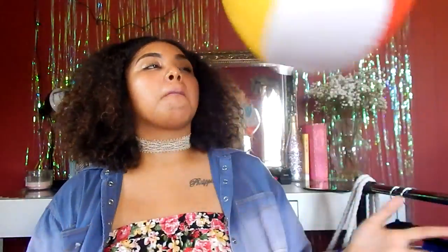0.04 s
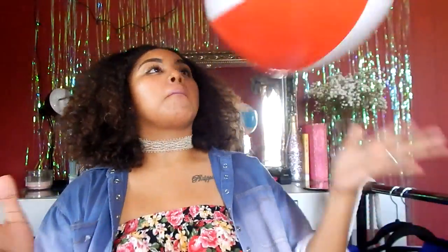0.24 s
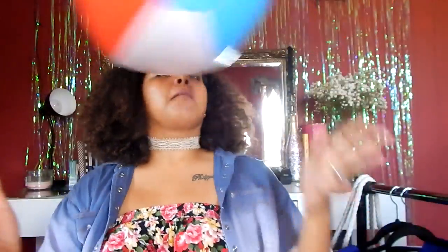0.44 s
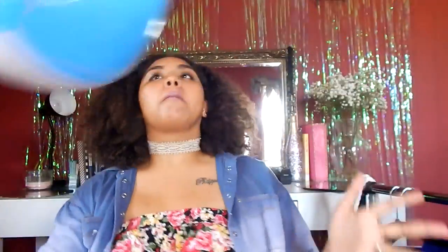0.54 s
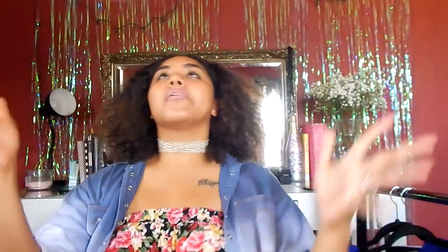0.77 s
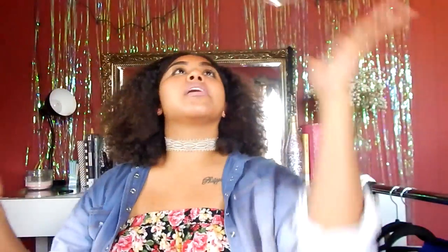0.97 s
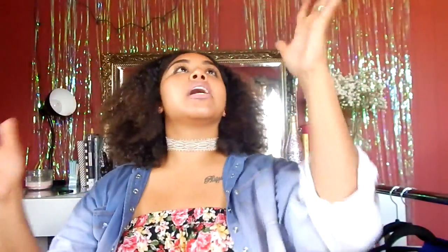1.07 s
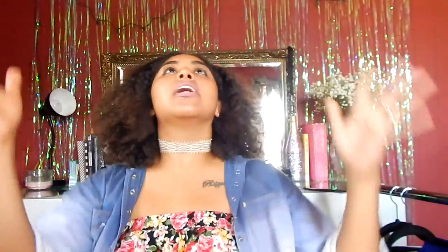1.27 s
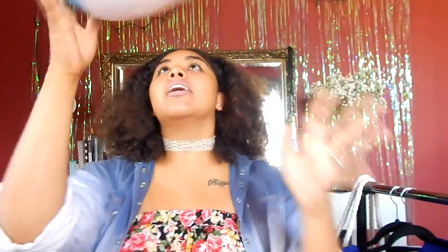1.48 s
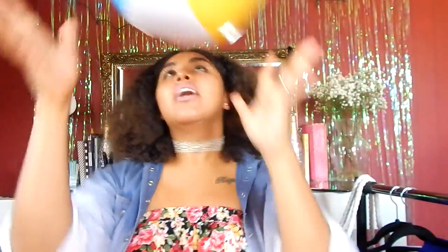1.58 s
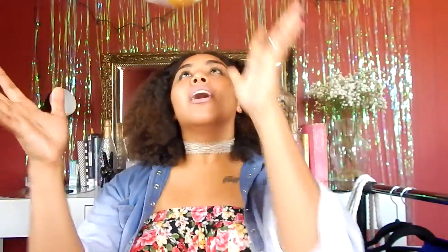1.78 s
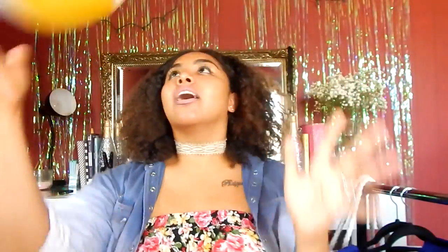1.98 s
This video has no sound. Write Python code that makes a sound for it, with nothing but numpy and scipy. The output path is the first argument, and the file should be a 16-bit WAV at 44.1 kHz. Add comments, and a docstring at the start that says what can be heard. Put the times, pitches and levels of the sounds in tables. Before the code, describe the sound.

An inflatable ball is batted by hand, close up in a small room. Hollow, ringing thumps land at 0.3, 0.6 and 1.0 seconds, the latter two strongest, with snappy vinyl cracks. A tiny squeak comes at 0.55, a flat smack at 0.76. Knocks on something hard overhead follow from 1.1, mixed with softer slaps around 1.4, 1.6 and 1.98. Short echoes, faint hum.

```python
"""In a small furnished room, a light inflatable ball is batted up by hand, close by.
Each slap thumps the skin (a sagging tone) and rings the air inside (modes driven by a burst); many blows
also crack (noise). Between slaps the ball knocks on something hard overhead; two flat smacks have no thump.
The vinyl squeaks once (a gliding tone), an earlier knock dies out and the room hums quietly (shaped noise).
Fresh noise, fading band by band, makes the echoing tails of the room."""
import sys
import numpy as np
from scipy import signal
from scipy.fft import rfft, irfft, next_fast_len
from scipy.io import wavfile
from scipy.ndimage import uniform_filter1d

SR = 44100
rng = np.random.default_rng(int(sys.argv[2]) if len(sys.argv) > 2 else 0)


def invert_db(x):
    """Field ratio 10**(x/20) for x, a level in decibels (scalar or array-like)."""
    u = np.asarray(x, float) / 20
    return 10 ** u


def to_wav(s):
    """Save 16-bit WAV."""
    ch = np.atleast_2d(s).T  # columns
    pcm = np.round(np.clip(ch, -1, 1) * 32767)  # PCM
    wavfile.write(sys.argv[1], SR, pcm.astype(np.int16))


N = 89214  # length [samples]


def evened(x):
    """Scales to rms 1."""
    return x / np.sqrt(np.mean(x ** 2) + 1e-20)


def read(points, hz):
    """Reads a spectrum table on a log-frequency axis."""
    f, value = np.transpose(points)
    return np.interp(np.log(hz + 1), np.log(f + 1), value)


def add(mix, s, sound):
    """Mixes a sound in at time s, cutting off what runs past the end."""
    part = mix[round(s * SR):][:len(sound)]
    part += sound[:len(part)]


def shaped(x, gain):
    """Passes a sound through a filter given as one gain per frequency, then scales it to rms 1."""
    return evened(irfft(rfft(x) * gain, len(x)))


def coloured(spectrum, size):
    """Noise of rms 1 with the given spectrum."""
    hz = np.fft.rfftfreq(size, 1 / SR)
    return shaped(rng.standard_normal(size), invert_db(read(spectrum, hz)))


# Colour of the hum: (frequency [Hz], relative level [dB per Hz])
HUM_SPECTRUM = [(20, 7), (258, -6), (305, -1), (372, 2.5), (535, -10.5), (870, -13), (1430, -12.5),
                (1950, -18), (9950, -27.5), (16500, -35.5)]
HUM_DB = -55.5


def hum():
    """Quiet background: random short-time spectra with lumpy patches, strongest in the low mids."""
    frames, hz = N // 256 + 5, np.fft.rfftfreq(1024, 1 / SR)
    a, b, patches = rng.standard_normal((frames, 513, 3)).T
    c, d = rng.standard_normal((frames, 513, 2)).T
    patches = uniform_filter1d(patches, size=4, axis=0)  # smooth over frequency, then time
    patches = evened(uniform_filter1d(patches, size=8, axis=1))
    lumps_db = (1.0 + 0.8 * (hz < 600))[:, None] * patches
    spectra = np.array([a + 1j * b, c + 1j * d]) * invert_db(read(HUM_SPECTRUM, hz)[:, None] + lumps_db)
    sound = signal.istft(spectra, nperseg=1024, noverlap=768)[1][:, :N]
    return invert_db(HUM_DB) * evened(sound)


# Colour of an earlier knock dying out: (frequency [Hz], relative level [dB per Hz])
FADING_SPECTRUM = [(200, -5), (610, -7), (693, -28), (1290, 0.5), (1590, -11), (9000, -33), (11700, -68)]
FADING_DB, FADING_T60_S = -53, 0.29  # starting level; time to fall by 60 dB


def fading_knock():
    """The tail of an earlier knock: two separate noises under one steady fade."""
    fade = invert_db(FADING_DB - 60 * np.arange(N) / SR / FADING_T60_S)
    return np.array([fade * coloured(FADING_SPECTRUM, N) for _ in range(2)])


# How long the room rings: (frequency [Hz], time to fall by 60 dB [s])
ROOM_T60 = [(210, 0.32), (560, 0.27), (1470, 0.22), (3880, 0.27), (10200, 0.23)]
ROOM_DB, GAP_S = -0.5, 0.0046  # gain of the tails; silence before they start
ROOM_LOW_HZ = 232  # the walls return little below this
BLUR_HZ = 2800  # above this the walls blur the fine colour of a blow


def room(x):
    """Diffuse tails: the power of each band lingers and dies at its own speed, played by fresh noise."""
    x = np.r_[np.zeros(round(GAP_S * SR)), x][:N]
    x = signal.lfilter(*signal.butter(2, ROOM_LOW_HZ, "high", fs=SR), x)
    hz, t, z = signal.stft(x, SR, nperseg=512, noverlap=384)
    power = abs(z) ** 2
    blurred = uniform_filter1d(power, size=9, axis=0)
    power = np.where(hz[:, None] > BLUR_HZ, blurred, power)
    keep = invert_db(-120 * t[1] / read(ROOM_T60, hz))  # share of the power left after one frame
    lingering = np.array([signal.lfilter([1 - k], [1, -k], p) for k, p in zip(keep, power)])
    a, b = rng.standard_normal((len(t), len(hz), 2, 2)).T
    spectra = (a + 1j * b) * np.sqrt(2 * abs(lingering))
    return invert_db(ROOM_DB) * signal.istft(spectra, nperseg=512, noverlap=384)[1][:, :N]


# How much louder the left port is: (frequency [Hz], left minus right level [dB])
LEAN = [(550, 0.54), (1650, -3), (4970, -1.5), (15000, -1.5)]
# How alike the tails are at left and right: (frequency [Hz], likeness [0 to 1])
TAILS_SAME = [(150, 0.99), (380, 0.97), (950, 0.82), (2380, 0.17), (5980, 0.015), (15000, 0.078)]
# How alike the hum is at left and right: (frequency [Hz], likeness [0 to 1])
HUM_SAME = [(60, 0.55), (240, 0.9), (950, 0.59), (3770, 0.064)]


def ports(a, b, likeness):
    """Diffuse sound at two microphone ports: the right hears a share of its own."""
    size = next_fast_len(N + 4096)
    hz = np.fft.rfftfreq(size, 1 / SR)
    same, lean = np.clip(read(likeness, hz), -1, 1), invert_db(read(LEAN, hz) / 2)
    a, b = rfft(a, size), rfft(b, size)
    right = same * a + np.sqrt(1 - same ** 2) * b
    return irfft(np.array([a * lean, right / lean]), size)[:, :N]


PORT_GAP_S, SHADOW_DB, SHADOW_HZ = 0.0001, 19, 5960  # lead and treble gain of the near port at side 1


def aimed(x, side):
    """Direct sound: the near port hears it earlier and brighter (side 1 is left, -1 right)."""
    size = next_fast_len(N + 4096)
    hz = np.fft.rfftfreq(size, 1 / SR)
    brighter = invert_db(side * SHADOW_DB / 2 * hz ** 2 / (hz ** 2 + SHADOW_HZ ** 2))
    earlier = np.exp(1j * np.pi * hz * side * PORT_GAP_S)
    lean = invert_db(read(LEAN, hz) / 2) * brighter * earlier
    return irfft(rfft(x, size) * np.array([lean, 1 / lean]), size)[:, :N]


# Path of the squeak's lowest tone: (time [s], pitch [Hz], rms level [dB])
SQUEAK = [(.538, 1955, -56), (.551, 1940, -46), (.566, 1900, -58), (.575, 1905, -54), (.59, 1895, -61)]
# Steady levels of the tones at 2 and 3 times that pitch: rms level [dB]
SQUEAK_UPPER_DB = [-58, -68]
SQUEAK_UPPER_S, SQUEAK_SIDE = 0.547, 0.82  # when the upper tones set in; side


def squeak():
    """Vinyl slipping against skin: a brief, mostly falling tone with two overtones that set in late."""
    s, hz, db = np.transpose(SQUEAK)
    t = np.arange(N) / SR
    turns = 2 * np.pi * np.cumsum(np.interp(t, s, hz)) / SR
    tone = invert_db(np.interp(t, s, db)) * np.sin(turns)
    upper = sum(invert_db(d) * np.sin((k + 2) * turns) for k, d in enumerate(SQUEAK_UPPER_DB))
    tone += np.clip((t - SQUEAK_UPPER_S) / 0.005, 0, 1) * upper
    edges = np.clip(np.minimum(t - s[0], s[-1] - t) / 0.0041, 0, 1)
    return np.sqrt(2) * tone * edges


BOOM_HZ, BOOM_T60_S, BOOM_RISE_S = 91.3, 0.16, 0.0063  # low room mode
PUSH_HZ, PUSH_DB, PUSH_S = 70, -11, 0.016  # puff of air: pitch, level against the mode, time to its peak


def boom(boom_db):
    """The lowest room mode swelling after a slap, and one slow push of air."""
    t = np.arange(16000) / SR
    swell = invert_db(-60 * t / BOOM_T60_S) * (1 - np.exp(-t / BOOM_RISE_S))
    mode = swell * np.sin(2 * np.pi * BOOM_HZ * t)
    puff = (t / PUSH_S * np.exp(1 - t / PUSH_S)) ** 2
    push = invert_db(PUSH_DB) * np.sin(2 * np.pi * PUSH_HZ * t) * puff
    return invert_db(boom_db) * (mode + push)


# Modes of the air inside the ball: (frequency [Hz], level before tilt and chance [dB])
AIR = [(440, 4.5), (540, 9.5), (710, 3), (955, -3.5), (1013, 4.5), (1100, -4), (1530, 1), (1700, 3.5),
       (1880, 5), (2110, -6), (2370, -2)]
AIR_SPREAD_DB, AIR_T60_S = 2.5, 0.06  # chance spread of mode levels; time to fall by 60 dB
FAVOUR_DB, FAVOUR_OCTAVES = 9, 0.28  # the spot struck drives the modes near one pitch steadily
SMACK_DB = 8  # gain of the smack noise, next to the ring


def ring(skin, ring_db, tilt_db, low_hz, contact, favoured_hz):
    """A short burst of pressure smacks the vinyl and rings the air modes, each by a chance amount."""
    t = np.arange(12000) / SR
    press = np.minimum(t / 0.00042, 1) * np.exp(-t / max(contact, 0.001))
    hz, db = np.transpose(AIR)
    db = db + tilt_db / 2 * np.log2(hz / 1500) + AIR_SPREAD_DB * rng.standard_normal(len(hz))
    modes = invert_db(db[:, None] - 60 * t / AIR_T60_S) * np.sin(2 * np.pi * np.outer(hz, t))
    # rough noise, plus a steady drive at each mode's own pitch that weakens with longer contact
    favour = np.exp(-(np.log2(hz / favoured_hz) / FAVOUR_OCTAVES) ** 2)
    steady = invert_db(FAVOUR_DB) * favour / np.sqrt(press.sum() / 4)
    turns = np.outer(hz, t) + rng.random((len(hz), 1))
    drive = rng.standard_normal(len(t)) + steady[:, None] * np.cos(2 * np.pi * turns)
    rung = signal.fftconvolve(press * drive, modes, axes=1)[:, :len(t)].sum(0)
    rung /= np.sqrt(np.mean(rung[:1300] ** 2))  # even loudness at the start
    octaves = np.log2(np.clip(np.fft.rfftfreq(len(t), 1 / SR), 1500, 3400) / 1500)
    smack = press * shaped(coloured(skin, len(t)), invert_db(tilt_db * octaves))
    low_cut = signal.butter(3, low_hz, "high", fs=SR, output="sos")
    return invert_db(ring_db) * signal.sosfilt(low_cut, rung + invert_db(SMACK_DB) * smack)


# Ball on something hard, up to the left: (time [s], ring level before the low cut [dB],
# brightness [dB per octave], low cut [Hz], contact decay [s], favoured pitch [Hz])
KNOCKS = [(1.108, -36, -14, 2040, 0.0066, 2400), (1.183, -40, 4, 420, 0.01, 1040),
          (1.445, -42.5, 5.5, 780, 0.019, 1080), (1.489, -36, -2.5, 710, 0.038, 1020),
          (1.861, -50, -5, 710, 0.025, 1920), (1.892, -52, -11, 610, 0.021, 980),
          (1.926, -38.5, -2.5, 660, 0.025, 1000), (1.954, -40, -4.5, 634, 0.046, 1090)]
# Colour of a knock's smack: (frequency [Hz], relative level [dB per Hz])
KNOCK_SPECTRUM = [(300, 2.5), (787, -7.5), (978, -6.5), (1320, -4.5), (2170, -0.5), (2570, -14.5),
                  (3890, -17.5), (9090, -22.5), (14000, -42.5), (16500, -60)]
OVERHEAD_SIDE = 0.72


def add_knocks(overhead):
    """The ball knocking on something hard: the air rings, with a smack of its own colour."""
    for s, *knock in KNOCKS:
        add(overhead, s, ring(KNOCK_SPECTRUM, *knock))


# Flat smacks on the vinyl, up to the left: (time [s], ring level before the low cut [dB],
# brightness [dB per octave], low cut [Hz], contact decay [s], favoured pitch [Hz])
FLICKS = [(.758, -37, 3.3, 880, .018, 1330), (1.392, -38.5, 5.4, 1240, 0.019, 1760)]


def add_flicks(overhead):
    """Flat smacks on the vinyl: they ring the air like a slap, with no thump."""
    for s, *flick in FLICKS:
        add(overhead, s, ring(SMACK_SPECTRUM, *flick))


# Vinyl cracking under fingers or against something hard: (time [s], level before CRACK_DB is added [dB])
CRACKS = [(0.301, -21.5), (0.3046, -28), (0.598, -13.5), (0.7587, -34), (0.9896, -23), (0.9946, -18.5),
          (0.9987, -22), (1.1833, -30.5), (1.3917, -38), (1.5991, -32.5), (1.6111, -28), (1.681, -42),
          (1.9814, -28.5), (1.9873, -27)]
# Colour of a crack: (frequency [Hz], relative level [dB per Hz])
CRACK_SPECTRUM = [(3240, -0.5), (6430, 4.5), (11700, 1.5), (14000, -6), (16000, -30), (16900, -62)]
CRACK_S, CRACK_DB = 0.0021, -6  # decay time; shared gain


def add_cracks(blows, overhead):
    """Vinyl cracks: tiny dying noise bursts, each placed with the blow nearest in time."""
    t = np.arange(600) / SR
    for s, db in CRACKS:
        nearest = np.argmin([abs(s - slap[0]) for slap in SLAPS])
        overhead_gap = min(abs(s - row[0]) for row in KNOCKS + FLICKS)
        target = overhead if overhead_gap < abs(s - SLAPS[nearest][0]) else blows[nearest]
        add(target, s, invert_db(db + CRACK_DB) * np.exp(-t / CRACK_S) * coloured(CRACK_SPECTRUM, len(t)))


THUMP_T60_S, SAG = 0.045, 0.058  # time to fall by 60 dB; share by which the note starts sharp
OVER, OVER_DB = 1.58, -10  # overtone: times the skin note, level against it
REBOUND_S, WOBBLE = 0.027, 0.2  # the skin snaps back into shape; uneven loudness of its note


def thump(thump_db, skin_hz, rise, rebound_db):
    """The skin note sagging in pitch, with its overtone, wobbling and rebounding once."""
    t = np.arange(12000) / SR
    turns = 2 * np.pi * skin_hz * np.cumsum(1 + SAG * np.exp(-t / 0.015)) / SR
    swell = np.zeros(len(t))
    for s, db in [(0, 0), (REBOUND_S, rebound_db)]:
        onset = np.sin(np.pi / 2 * np.clip((t - s) / max(rise, 0.001), 0, 1))
        swell += invert_db(db - 60 * np.maximum(t - s - rise, 0) / THUMP_T60_S) * onset
    slow_noise = uniform_filter1d(rng.standard_normal((2, len(t))), size=300, axis=1)
    wobble = 1 + WOBBLE * evened(slow_noise)
    tones = wobble[0] * np.sin(turns) + wobble[1] * invert_db(OVER_DB) * np.sin(OVER * turns)
    return tones * swell * invert_db(thump_db)


# Hand on ball: (time [s], thump level [dB], settled skin pitch [Hz], thump rise [s],
# rebound against thump [dB], boom level [dB], ring level before the low cut [dB], contact decay [s],
# favoured pitch [Hz], side [1 left, -1 right])
SLAPS = [(.297, -21.5, 233.2, 0.0036, -4, -23.5, -40.5, 0.017, 740, -0.25),
         (0.596, -16.5, 247.2, 0.0049, -9, -18, -35, 0.017, 1030, 0.8),
         (.990, -16, 201.2, 0.0052, -15.5, -25.5, -35.5, 0.021, 790, -0.45),
         (1.418, -21, 179, 0.0011, -6.5, -24, -40.5, 0.007, 680, 0.16),
         (1.599, -26, 166, 0.0041, -16, -27, -56, 0.0043, 700, -0.26),
         (1.612, -39.5, 222.4, 0.017, -7.5, -24, -43.5, 0.017, 1150, -0.082),
         (1.831, -49, 196, 0.0067, -6, -39, -68, 0.041, 510, 0.9),
         (1.975, -23.5, 179, 0.0044, -13, -30.5, -39.5, 0.0064, 1030, 0.81)]
# Colour of the smack of a slap or flick: (frequency [Hz], relative level [dB per Hz])
SMACK_SPECTRUM = [(240, -13), (400, -7.5), (814, -3), (1760, -5.5), (3370, -11), (3930, -17.5),
                  (10500, -26), (14500, -38.5), (16500, -55)]


def add_slaps(blows, low):
    """The hand hitting the ball: the skin thumps, the air inside rings and the room booms."""
    for blow, slap in zip(blows, SLAPS):
        s, thump_db, skin_hz, rise, rebound_db, boom_db, ring_db, contact, favoured_hz, _ = slap
        add(blow, s, thump(thump_db, skin_hz, rise, rebound_db))
        add(blow, s, ring(SMACK_SPECTRUM, ring_db, 0.091, 250, contact, favoured_hz))
        add(low, s, boom(boom_db))


def scene():
    """All blows and the squeak from their sides, their room, the fading start and the hum."""
    blows, overhead, low = np.zeros((len(SLAPS), N)), np.zeros(N), np.zeros(N)
    add_slaps(blows, low)
    add_knocks(overhead)
    add_flicks(overhead)
    add_cracks(blows, overhead)
    slip = squeak()
    direct = sum(aimed(blow, slap[-1]) for blow, slap in zip(blows, SLAPS))
    direct = direct + aimed(overhead, OVERHEAD_SIDE) + aimed(slip, SQUEAK_SIDE)
    tails = room(blows.sum(0) + overhead + slip / 3) + fading_knock()
    return direct + ports(*tails, TAILS_SAME) + ports(*hum(), HUM_SAME) + low


def top_cut(x):
    """Nothing passes above the cut-off."""
    return signal.sosfilt(signal.butter(12, 15800, fs=SR, output="sos"), x)


MIC_LOW_HZ = 67.7
NOTCH_HZ, NOTCH_WIDTH_HZ = 2500, 30


def record(dry):
    """The microphone's bass roll-off, then narrow notches at the first four multiples of one frequency."""
    mix = signal.lfilter(*signal.butter(2, MIC_LOW_HZ, "high", fs=SR), dry)
    for k in range(1, 5):
        notch = signal.iirnotch(k * NOTCH_HZ, k * NOTCH_HZ / NOTCH_WIDTH_HZ, SR)
        mix = signal.lfilter(*notch, mix)
    return top_cut(mix)


dry = scene()
out = record(dry)
to_wav(out)
```